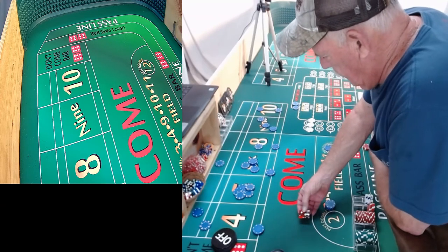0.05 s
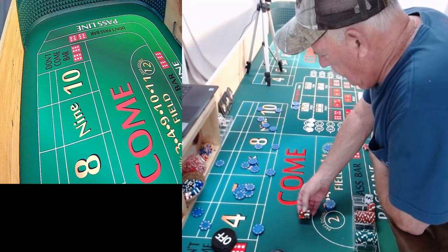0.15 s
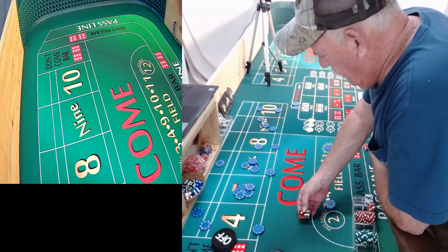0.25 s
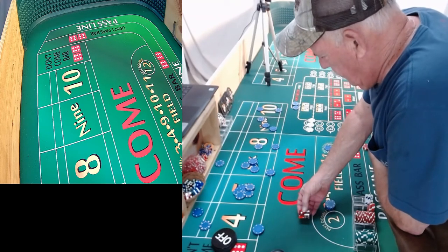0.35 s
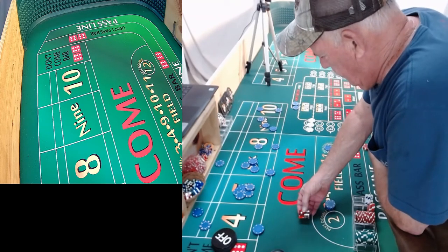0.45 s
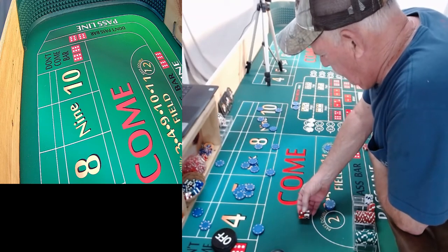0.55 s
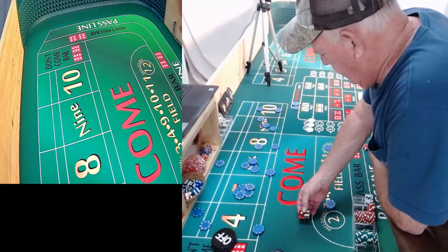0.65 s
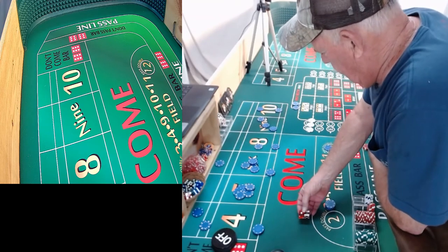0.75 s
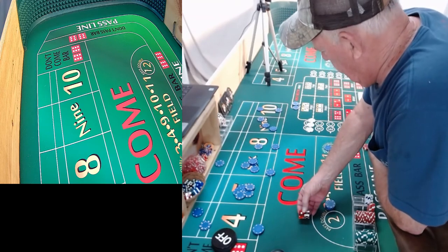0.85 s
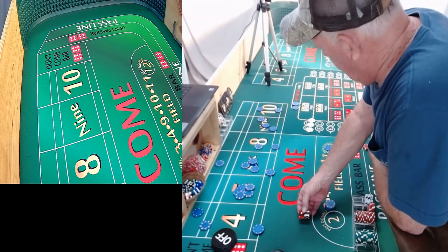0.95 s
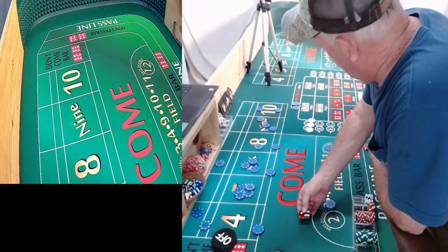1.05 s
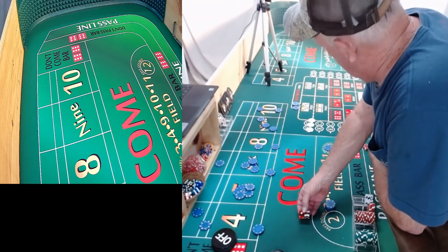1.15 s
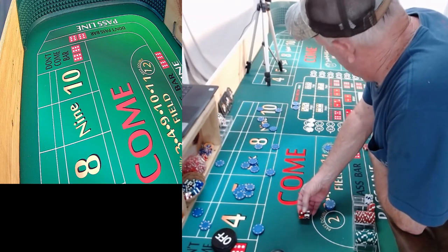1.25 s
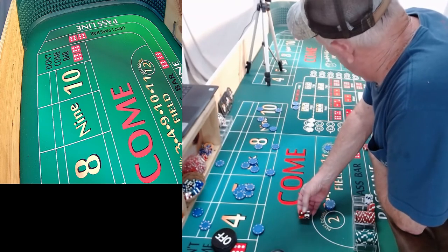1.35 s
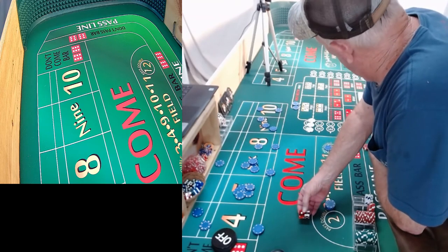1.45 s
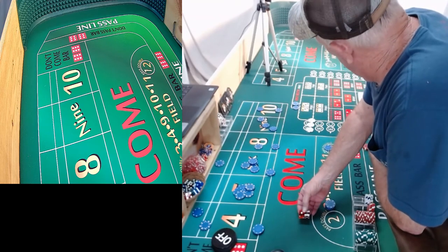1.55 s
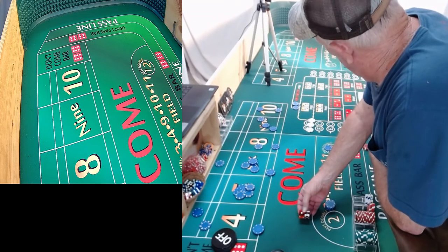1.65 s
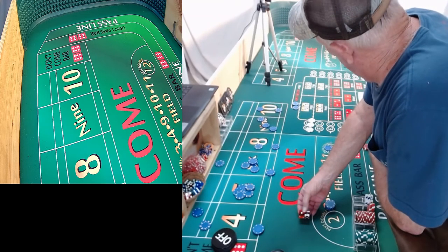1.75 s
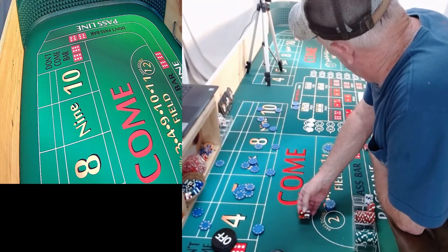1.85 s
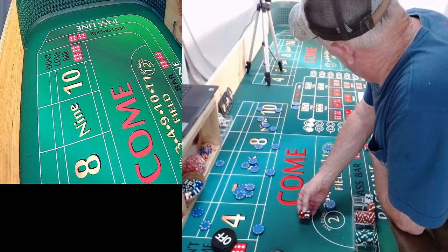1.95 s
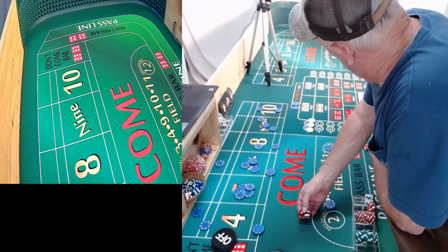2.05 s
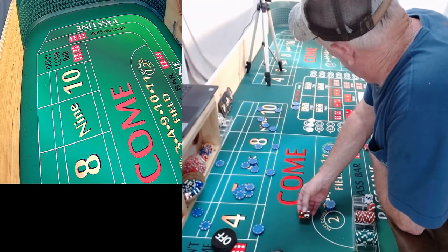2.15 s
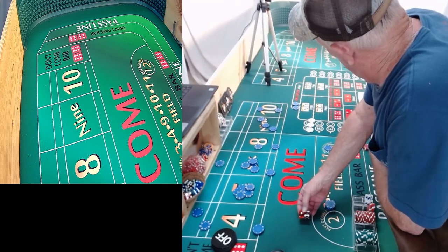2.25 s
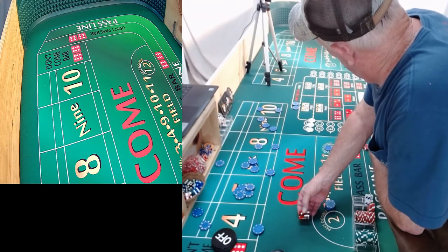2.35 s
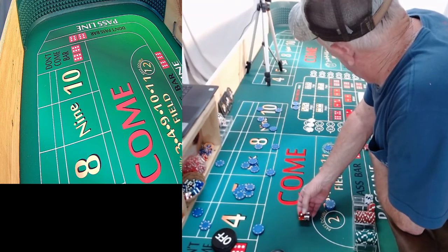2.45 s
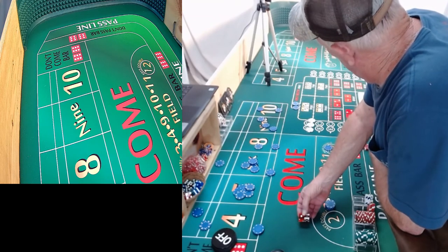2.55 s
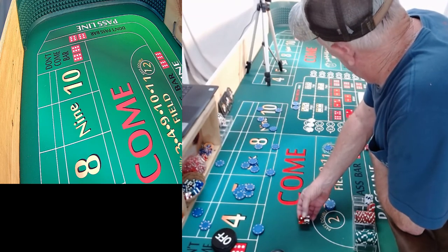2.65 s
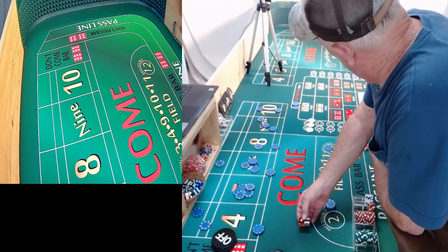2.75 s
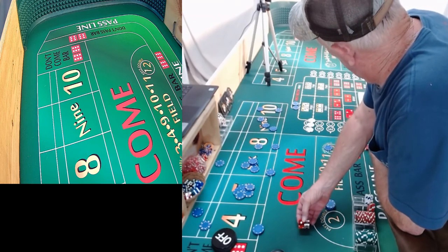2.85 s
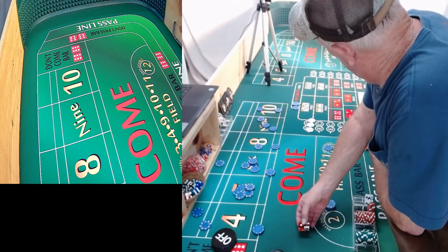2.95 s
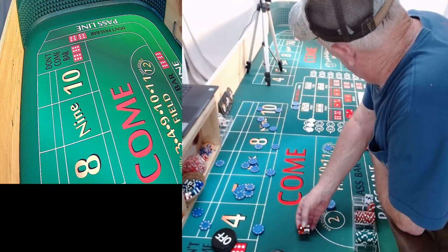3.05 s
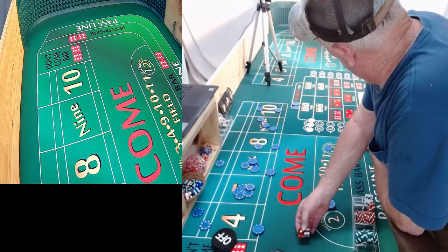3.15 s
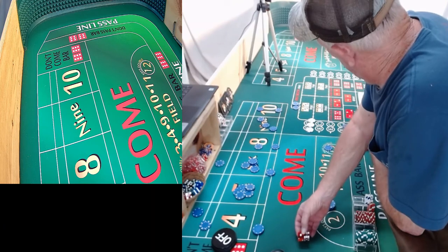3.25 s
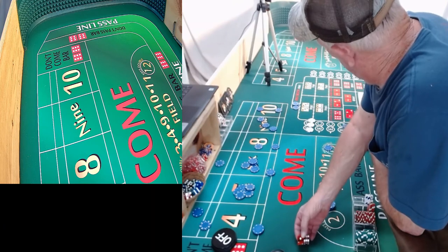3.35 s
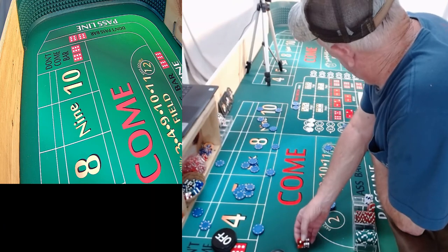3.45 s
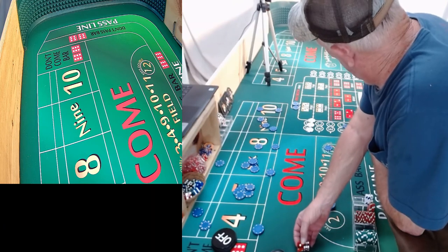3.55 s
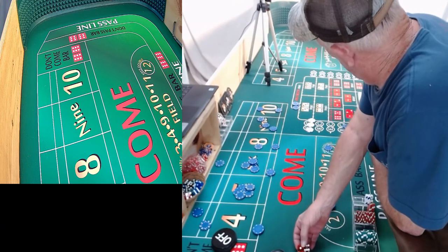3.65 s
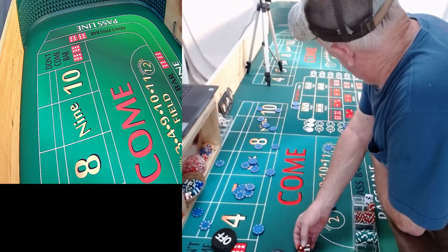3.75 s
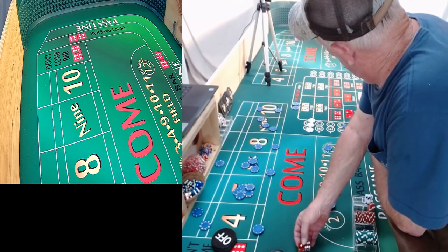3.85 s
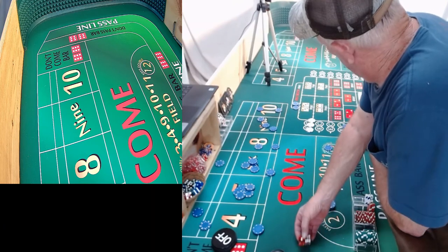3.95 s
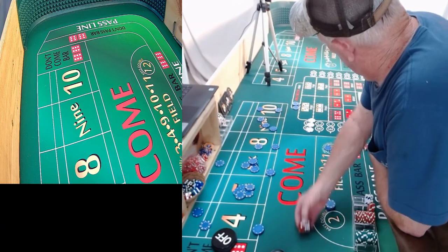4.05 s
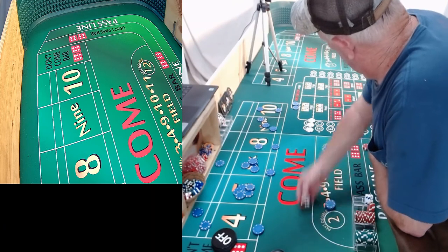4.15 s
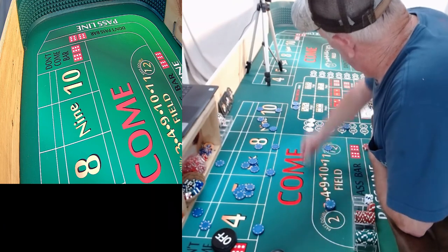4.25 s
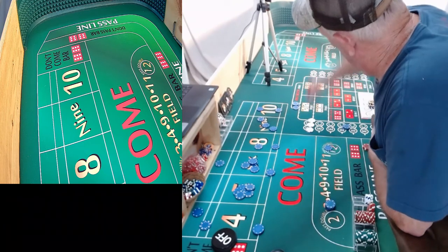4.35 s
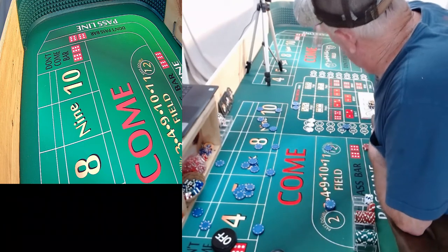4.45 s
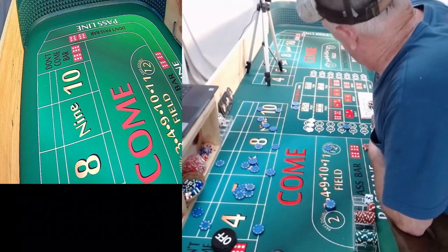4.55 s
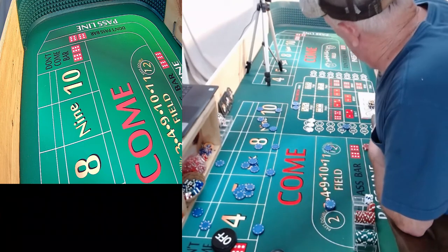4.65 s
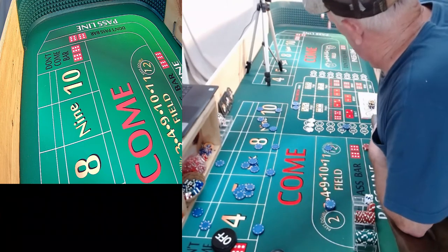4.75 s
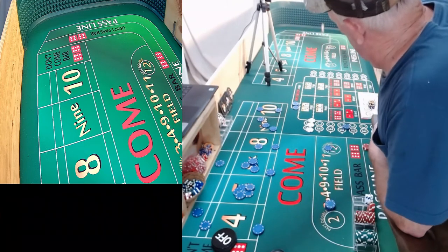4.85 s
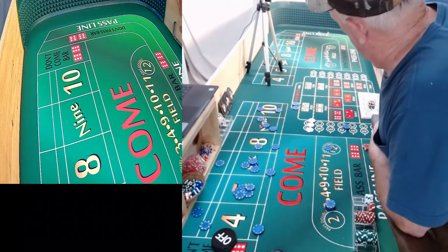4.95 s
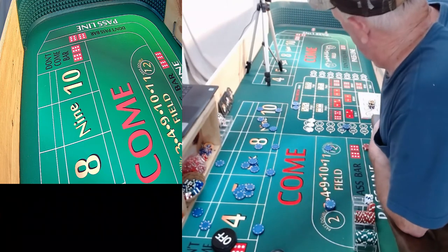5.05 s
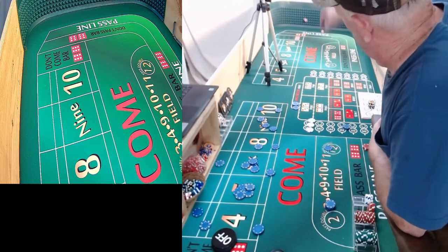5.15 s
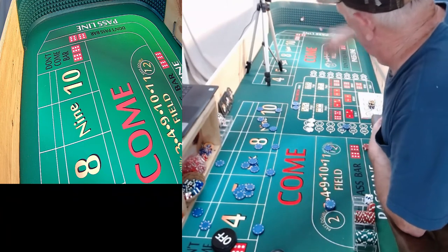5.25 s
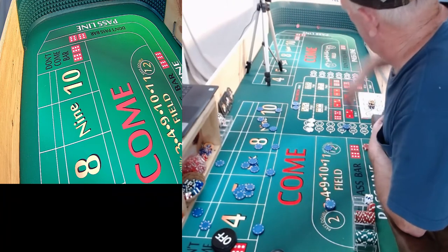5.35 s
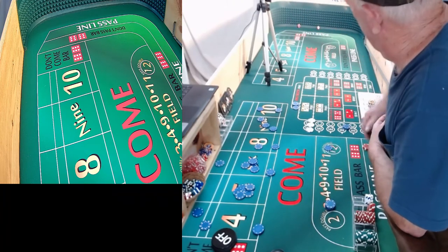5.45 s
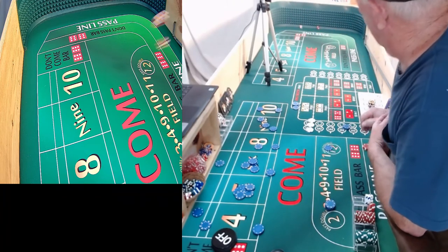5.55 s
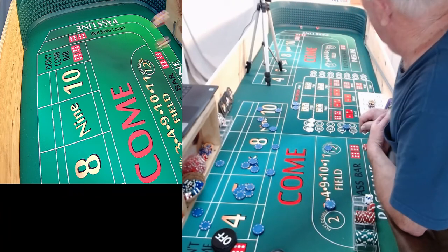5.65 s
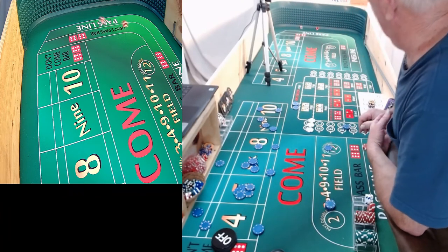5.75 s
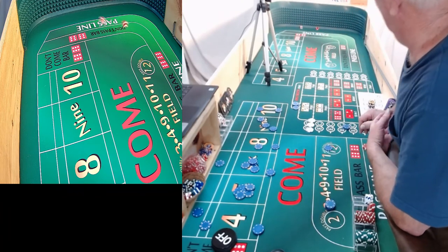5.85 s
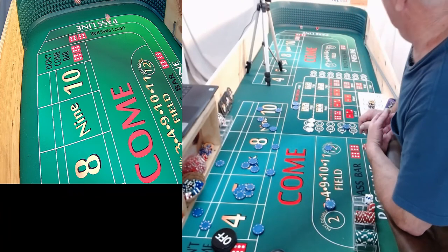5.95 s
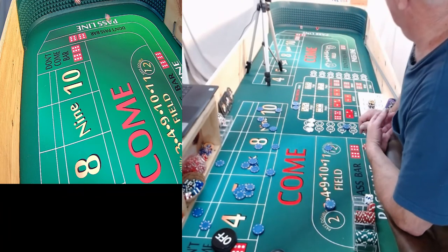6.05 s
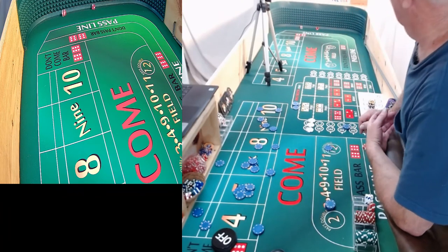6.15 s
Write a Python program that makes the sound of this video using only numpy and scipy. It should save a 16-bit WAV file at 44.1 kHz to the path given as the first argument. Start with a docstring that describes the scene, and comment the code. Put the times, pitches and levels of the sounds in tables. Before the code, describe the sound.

From 0 s a fan hums indoors: a wavering low motor tone around 210 Hz, weaker tones around it, surging low air rumble, a smooth soft rush and slight hiss. A deeper duct drone is strongest around 0.4 s, then comes and goes. Nothing else stands out until about 4 s, when a sleeve brushes almost inaudibly. At 4.92 s two dice hit a felt-covered wooden table 33 milliseconds apart, fusing into one very loud, hollow, clipped knock with a short boxy ring. At 5.13 s comes a strong but duller thump off the rubber wall, then rapidly weakening bumps to about 5.5 s. Tiny dry ticks fall near 5.5, 5.9 and 6.15 s, under faint cloth movement. The hum continues to the end, slightly lowered after the knock. The microphone is narrow, with little treble.

```python
"""A small room where a fan motor hums: two dice are thrown onto a felt-covered wooden gaming table.
They land 33 ms apart in one loud knock, hit the rubber back wall and tumble to rest, with a few faint ticks.
Dice are ringing modes and decaying noise; ticks, sleeve and air are shaped noise; the motor is wavering sines.
The small voice microphone has narrow notches and little treble; the knock overloads it and lowers its gain."""
import sys
import numpy as np
from scipy import signal
from scipy.fft import rfft, irfft, next_fast_len
from scipy.io import wavfile
from scipy.ndimage import uniform_filter1d, map_coordinates

SR = 44100
rng = np.random.default_rng(int(sys.argv[2]) if len(sys.argv) > 2 else 0)


def wav_record(signal):
    """Record a signal, one row per channel, as 16-bit PCM in the file named by sys.argv[1]."""
    frames = np.transpose(np.atleast_2d(signal))
    bounded = np.clip(frames, -1, 1)
    # unit amplitude maps onto the largest positive 16-bit level
    quanta = np.round(bounded * 32767).astype(np.int16)
    wavfile.write(sys.argv[1], SR, quanta)


N = 272965
TIME = np.arange(N) / SR


def from_db(db):
    """Decibels to amplitude gain."""
    return 10 ** (np.asarray(db) / 20)


def rms_one(x):
    """Scale to unit power."""
    return x / np.sqrt(np.mean(x ** 2) + 1e-20)


def at_hz(points, hz):
    """Read a table of (Hz, value) along a log-frequency axis."""
    table_hz, values = np.array(points).T
    return np.interp(np.log(np.maximum(hz, 1)), np.log(table_hz), values)


def at_time(points):
    """Read a table of (s, value) at every sample, with straight lines between its rows."""
    return np.interp(TIME, *np.transpose(points))


def noise(colour, size=N):
    """Noise of a given colour, rms 1: a white spectrum is weighted bin by bin."""
    padded = next_fast_len(size, True)
    bins = rfft(rng.standard_normal(padded))
    bins_hz = np.arange(len(bins)) * SR / padded
    coloured = irfft(bins * from_db(at_hz(colour, bins_hz)), padded)
    return rms_one(coloured[:size])


def drift(knots_per_s):
    """Smooth random wander, rms 1: a cubic curve through random knots."""
    knots = rng.standard_normal(int(TIME[-1] * knots_per_s) + 2)
    return rms_one(map_coordinates(knots, [TIME * knots_per_s], order=3, mode="nearest"))


def decay(t, t60_s):
    """Exponential fall of 60 dB in t60_s."""
    return np.exp(-np.log(1000) * t / t60_s)


def low_pass(x, cutoff_hz):
    """Soften the treble with a second-order slope."""
    return signal.sosfilt(signal.butter(2, cutoff_hz, fs=SR, output="sos"), x)


def add(out, start_s, sound):
    """Mix a sound in at a given time."""
    at = int(start_s * SR)
    out[at:at + len(sound)] += sound[:N - at]


# Ringing modes of the table bed: pitch_hz [Hz], level_db [dB, relative], t60_s [s]
TABLE_MODES = [(120.6, -21.5, 0.49), (146.5, -12, 0.22), (168.8, -14, 0.46), (194.8, -14.5, 0.46),
               (247.4, -9, 0.14), (290.5, -10, 0.16), (334.2, -10, 0.2), (404, -13.5, .19),
               (495.6, -17, 0.21), (540, -22, 0.18), (605, -21, 0.25), (887, -20.5, 0.12), (940, -23, 0.26),
               (1008, -25.5, 0.26), (1128, -23.5, 0.19), (1140, -21, 0.18), (1240, -31.5, 0.22),
               (1310, -29, .2), (1340, -26, 0.2), (1490, -35, 0.11), (2100, -37.5, .17)]


def thump(t, spread_db=2):
    """Bed modes ring as decaying sines of alternating sign; the place of the blow varies their strengths."""
    pitch_hz, level_db, t60_s = np.transpose(TABLE_MODES)[:, :, None]
    strength = from_db(level_db + spread_db * rng.standard_normal(pitch_hz.shape))
    strength[1::2] *= -1
    modes = strength * np.sin(2 * np.pi * pitch_hz * t) * decay(t, t60_s)
    return np.sum(modes, axis=0)


# Colour of the dense panel and room ringing after a blow: pitch_hz [Hz], level_db [dB per Hz, relative]
CLACK_COLOUR = [(100, -14), (200, -3), (400, 5.5), (600, 3.5), (800, 2), (1100, 2.5), (1500, -3.5),
                (2100, -8), (2800, -19), (4000, -13.5), (6000, -20), (8000, -33)]
# How long that ringing lasts: pitch_hz [Hz], t60_s [s]
CLACK_DECAY = [(150, 0.38), (500, 0.24), (1100, 0.25), (2000, 0.24), (4000, 0.15), (8000, 0.16)]


def clack(t):
    """Countless close modes and reflections: noise in half-octave bands, each with its own decay."""
    source = noise(CLACK_COLOUR, size=len(t))
    out = np.zeros(len(t))
    edges_hz = 90 * 2 ** np.arange(0, 7, .5)
    for low_hz, high_hz in zip(edges_hz, edges_hz[1:]):
        band_pass = signal.butter(3, [low_hz, high_hz], "band", fs=SR, output="sos")
        t60_s = at_hz(CLACK_DECAY, np.sqrt(low_hz * high_hz))
        out += signal.sosfiltfilt(band_pass, source) * decay(t, t60_s)
    return out


# Dice on the table: start_s [s], thump_level_db and clack_level_db [dB, relative], contact_cutoff_hz [Hz]
DICE_BLOWS = [(4.9176, 3.5, -2, 2220), (4.951, 5.5, 1, 2240), (4.972, -12, -2, 1790),
              (5.001, -8, -14, 1600), (5.1306, 2.5, -5.5, 890), (5.156, -7, -13, 1100),
              (5.201, -13, -31, 900), (5.237, -14.5, -13.5, 1090), (5.396, -25, -20.5, 985),
              (5.529, -17, -38, 700)]


def dice(clack_db=-5.5, thump_lag_s=0.00347, swell_s=0.0013):
    """Each blow gives a clack; the slow bending waves of the bed follow as a thump."""
    out, t = np.zeros(N), TIME[:SR]
    swell = 1 - np.exp(-t / swell_s)   # the felt cushions the contact
    for start_s, thump_level_db, clack_level_db, contact_cutoff_hz in DICE_BLOWS:
        hard = low_pass(swell * clack(t), contact_cutoff_hz)
        add(out, start_s, from_db(clack_level_db + clack_db) * hard)
        bed = low_pass(thump(t), contact_cutoff_hz)
        add(out, start_s + thump_lag_s, from_db(thump_level_db) * bed)
    return out


# Light hard ticks: start_s [s], level_db [dB, relative]
TICK_EVENTS = [(5.5138, -35), (5.884, -34), (5.9303, -39.5), (6.1544, -39)]
# Their colour: pitch_hz [Hz], level_db [dB per Hz, relative]
TICK_SPECTRUM = [(1500, -17), (2800, -12.5), (3600, 9), (5000, 5), (7000, -2), (9000, -33)]


def ticks(gain_db=2.0, t60_s=0.017):
    """Small hard things touch: dry snaps of noise a few milliseconds long."""
    out, t = np.zeros(N), TIME[:SR // 10]
    for start_s, level_db in TICK_EVENTS:
        snap = noise(TICK_SPECTRUM, size=len(t)) * decay(t, t60_s)
        add(out, start_s, from_db(level_db + gain_db) * snap)
    return out


# Level of the thrower's sleeve, before its flutter: start_s [s], level_db [dB rms]
SLEEVE_LEVEL = [(0, -75.5), (3, -64), (4.2, -55.5), (4.9, -56.5), (5.1, -44), (5.3, -49), (5.6, -50),
                (6.19, -56.5)]
# Colour of the cloth: pitch_hz [Hz], level_db [dB per Hz, relative]
SLEEVE_SPECTRUM = [(400, -8.5), (1200, 7), (2200, 0), (3300, -7), (5000, -8), (7000, -29)]


def sleeve(flutter_db=2.0):
    """Cloth brushes faintly as the arm swings and is drawn back: noise with a fluttering level."""
    level_db = at_time(SLEEVE_LEVEL) + flutter_db * drift(27)
    return from_db(level_db) * noise(SLEEVE_SPECTRUM)


# Fan motor tones, before their waver: pitch_hz [Hz], level_db [dB rms]
MOTOR_TONES = [(63, -45.5), (211.5, -28.5), (238.5, -42.5), (317, -41), (397, -44.5), (795, -58)]


def motor(waver_db=2.5, phase_wander_rad=.4):
    """Motor tones: sines whose level and phase wander independently."""
    out = np.zeros(N)
    for pitch_hz, level_db in MOTOR_TONES:
        level = np.sqrt(2) * from_db(level_db + waver_db * drift(3.907))   # rms to peak
        phase = 2 * np.pi * pitch_hz * TIME + phase_wander_rad * drift(2.99)
        out += level * np.sin(phase)
    return out


# Rumble of the moving air: pitch_hz [Hz], level_db [dB per Hz, relative]
RUMBLE_COLOUR = [(45, -47.5), (70, -27), (95, -15.5), (135, -12.5), (160, -6), (195, 0.5), (225, -7),
                 (275, -8), (370, -10), (490, -20.5), (700, -28.5), (1500, -71)]
# Even rush of air: pitch_hz [Hz], level_db [dB per Hz, relative]
RUSH_COLOUR = [(60, -30.5), (300, -2.5), (590, 6), (950, 2), (1250, -4), (1650, -9.5), (2200, -17.5),
               (2900, -30), (7000, -51.5)]


def moving_air(rumble_db=-25.5, surge_db=1.87, surge_knots_per_s=4.525, rush_db=-38.0):
    """Moving air: low noise with a slow random surge, under a steady brighter rush."""
    rumble = from_db(rumble_db + surge_db * drift(surge_knots_per_s)) * noise(RUMBLE_COLOUR)
    return rumble + from_db(rush_db) * noise(RUSH_COLOUR)


# Duct resonance: pitch_hz [Hz], width_hz [Hz]
DUCT = (112, 12)
# Level of its drone, strongest near the start: start_s [s], level_db [dB, relative]
DUCT_LEVEL = [(0, -31.5), (.4, -27), (1.6, -42), (2.9, -34.5), (3.65, -41.5), (4.1, -34.5), (4.7, -40)]


def duct_drone(gain_db=-0.5):
    """A droning duct: white noise passes twice through one narrow resonance."""
    pitch_hz, width_hz = DUCT
    resonance = signal.iirpeak(pitch_hz, pitch_hz / width_hz, fs=SR)
    once = signal.lfilter(*resonance, rng.standard_normal(N + SR))
    twice = signal.lfilter(*resonance, once)
    drone = rms_one(twice[SR:])   # the first second lets the resonance build up
    return from_db(at_time(DUCT_LEVEL) + gain_db) * drone


def fan():
    """The fan in the room: motor tones, moving air and a droning duct."""
    return motor() + moving_air() + duct_drone()


def scene():
    """Everything reaches one microphone."""
    return (dice() + ticks() + sleeve() + fan())[None]


def gain_control(x, threshold_db=-6.0, most_db=4.5, release_db_per_s=0.3, attack_s=0.45):
    """A loud sound slowly turns the gain down, and it stays down for a while."""
    power = uniform_filter1d(x ** 2, SR // 20)   # 50 ms average
    level_db = 10 * np.log10(np.maximum(power, 1e-12))
    over_db = np.clip(level_db - threshold_db, 0, most_db)
    # hold the highest excess, letting it sink at the release rate
    release_db = release_db_per_s * TIME
    held_db = np.maximum.accumulate(over_db + release_db, axis=-1) - release_db
    pole = np.exp(-1 / (attack_s * SR))
    cut_db = signal.lfilter([1 - pole], [1, -pole], held_db)
    return x * from_db(-cut_db)


# Microphone hiss, before the notches and voice band: pitch_hz [Hz], level_db [dB per Hz, relative]
MIC_HISS = [(20, 1.5), (1000, 2.5), (2900, -7.5), (3600, 2.5), (5200, 2), (6400, -3), (7500, -15),
            (8600, -29.5), (9300, -45.5)]
# Microphone notches: pitch_hz [Hz], width_hz [Hz], depth_db [dB, negative is deeper]
MIC_NOTCHES = [(758, 345, -34.5), (4470, 850, -30), (6000, 930, -21.5), (8000, 1200, -34.5)]


def record(dry, hiss_db=-53.0, voice_band_hz=7700, cutoff_hz=16000):
    """Gain control, hiss, notches and a narrow voice band; peaks clip flat before a last treble cut."""
    x = gain_control(dry) + from_db(hiss_db) * noise(MIC_HISS)
    for pitch_hz, width_hz, depth_db in MIC_NOTCHES:
        leak = from_db(depth_db)   # what remains at the bottom of the notch
        notched = signal.lfilter(*signal.iirnotch(pitch_hz, pitch_hz / width_hz, fs=SR), x)
        x = leak * x + (1 - leak) * notched
    voice = signal.sosfilt(signal.ellip(8, .5, 50, voice_band_hz, fs=SR, output="sos"), x)
    clipped = np.clip(voice, -1, 1)
    return signal.sosfilt(signal.butter(12, cutoff_hz, fs=SR, output="sos"), clipped)


dry = scene()
out = record(dry)
wav_record(out)
```